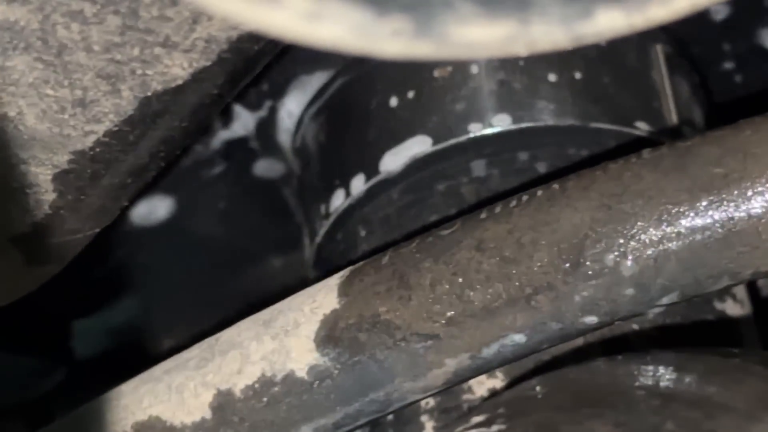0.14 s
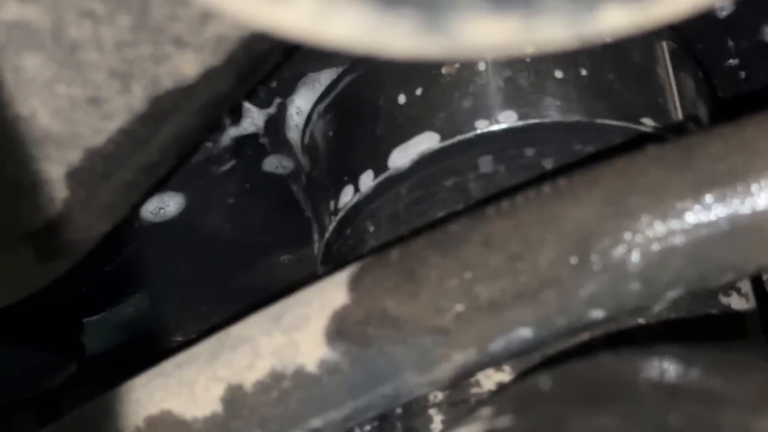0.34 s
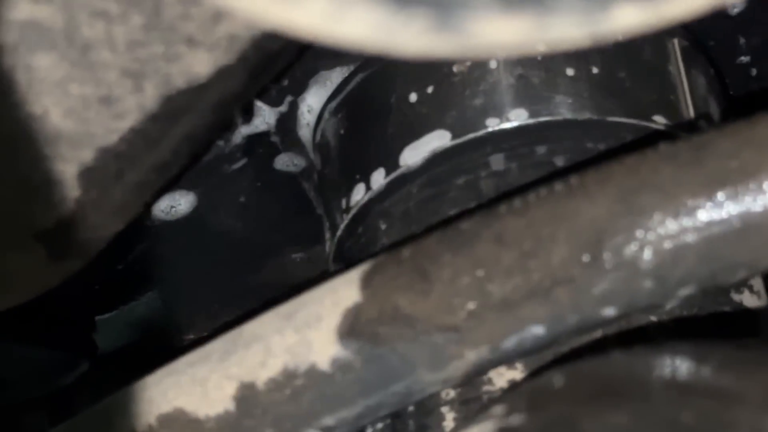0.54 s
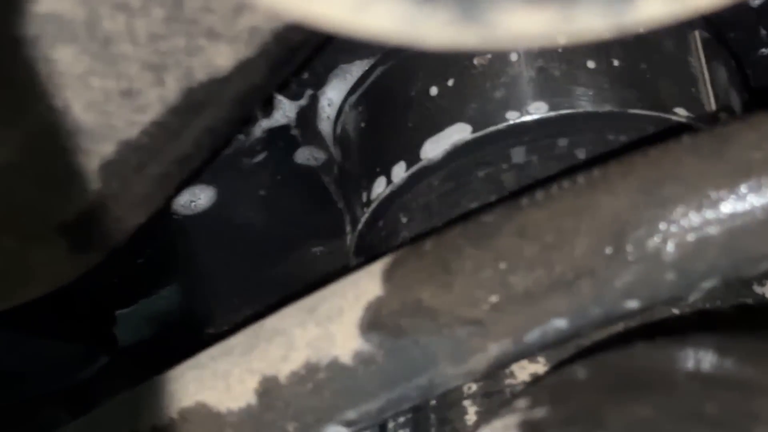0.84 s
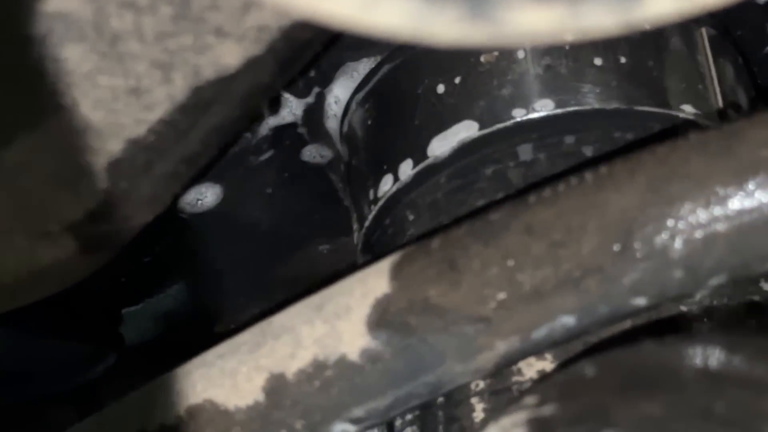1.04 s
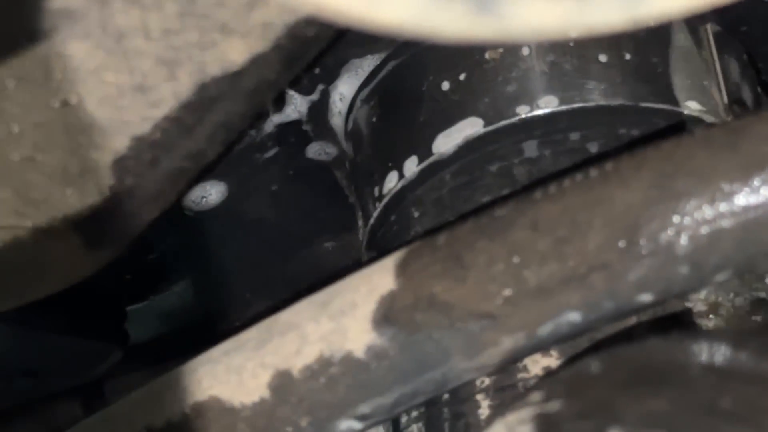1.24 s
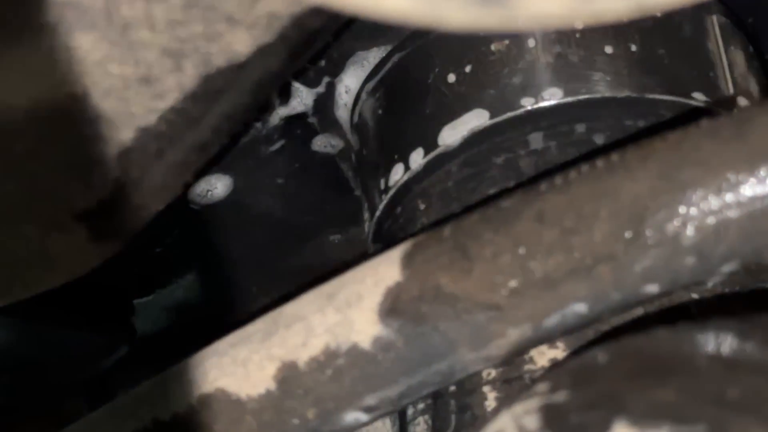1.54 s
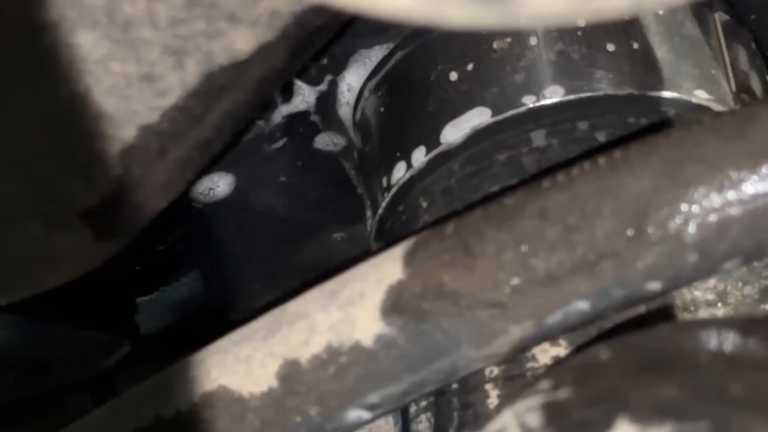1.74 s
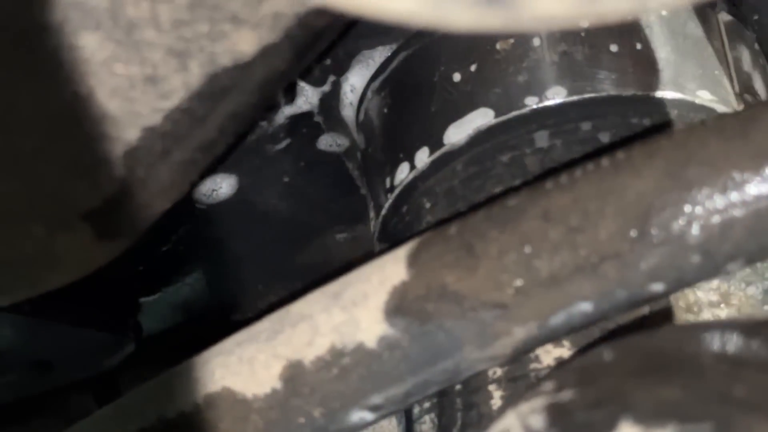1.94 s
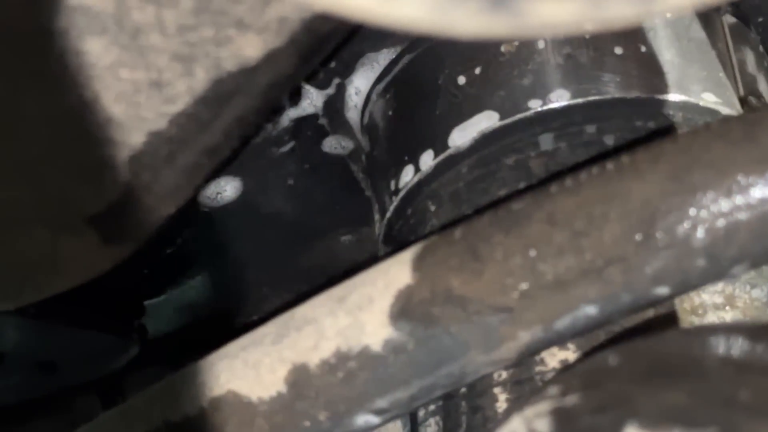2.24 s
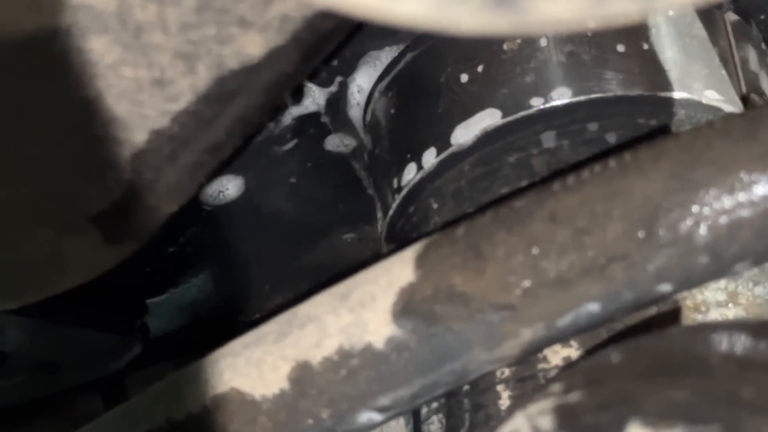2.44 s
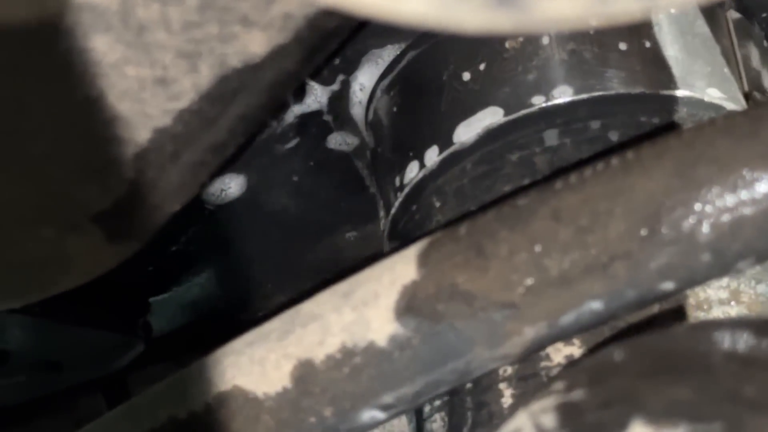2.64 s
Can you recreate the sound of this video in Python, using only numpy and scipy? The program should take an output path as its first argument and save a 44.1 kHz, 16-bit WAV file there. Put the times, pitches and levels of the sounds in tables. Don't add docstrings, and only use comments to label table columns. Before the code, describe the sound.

A pressurised air leak hisses loudly and continuously from a soapy metal pipe joint, very close to a handheld phone, with fine foam ticks, two soft handling bumps and a faint low workshop rumble.

```python
import sys
import numpy as np
from scipy import signal
from scipy.fft import rfft, irfft, next_fast_len
from scipy.io import wavfile
from scipy.ndimage import uniform_filter1d

SR = 44100
rng = np.random.default_rng(int(sys.argv[2]) if len(sys.argv) > 2 else 0)


def transcribe(u):
    v = np.clip(np.atleast_2d(u).T, -1, 1)
    q = np.round(v * 32767).astype(np.int16)
    wavfile.write(sys.argv[1], SR, q)


def ratio(d):
    e = np.asarray(d, float) / 20
    return 10 ** e


N = 123479
SIZE = next_fast_len(N + 4096)
HZ = np.arange(SIZE // 2 + 1) * SR / SIZE

# [f/Hz, width/Hz,
# level/dB]
JET_RESONANCES = [(2140, 60, -19), (2250, 110, -15), (2640, 210, -26.5), (3000, 280, -35.5), (3260, 110, -28),
                  (3540, 320, -33.5), (3795, 100, -18.5), (4030, 170, -30), (4345, 90, -25), (4570, 180, -25.5),
                  (4850, 340, -25.5), (5240, 330, -23), (5560, 240, -23), (5810, 170, -20),
                  (6200, 210, -14.3), (6600, 280, -7.4), (6800, 150, -11.7), (6990, 190, -9.8),
             (7160, 170, -11.6), (7470, 380, -8.1), (7700, 40, -15.0), (7930, 180, -4.0), (8460, 520, -4.7),
             (8950, 310, -5.8), (9090, 60, -8.0),
                  (9350, 200, -13.4), (9570, 210, -7.2), (10010, 260, -9.9), (10330, 250, -8.8),
             (10620, 250, -9.3), (10860, 160, -4.6), (11010, 90, -9.9), (11110, 160, -10.9),
             (11290, 130, -1.6), (11440, 90, -10.4), (11570, 100, -7.7), (12040, 550, -5.1),
             (12310, 300, -6.5),
                  (12570, 160, -2.6), (12770, 160, -0.7), (13050, 230, -4.9), (13340, 130, -6.2),
             (13660, 250, -0.1), (13900, 100, -5.1), (14100, 280, -3.2), (14480, 160, -5.3),
             (14690, 170, -10.6), (14810, 120, -9.4), (15030, 180, -14.1), (15280, 480, -14.8),
             (15630, 160, -6.7)]
JET_MODES = JET_RESONANCES
# [t/s, level/dB]
FOAM_SPITS = [
    (.648, -10),
    (.9127, -3),
    (.9605, -8),
    (1.71, -9),
    (1.823, -6),
]
# [f/Hz, phase/rad]
PORT_LEAD = [(6000, 0.), (6900, -.75), (7450, -3.14), (8080, -6.05), (9200, -5.7), (10100, -3.35),
             (11700, -3.05), (14050, -.03)]
# [f/Hz, width/Hz, level/dB]
SCATTER_PATHS = [(6350, 700, -10), (7800, 340, -6), (9800, 1200, -4), (13000, 1300, -7), (15620, 330, -11)]
# [t/s, level/dB]
HAND_BUMPS = [
    (1.279, -28.5),
    (1.829, -35.5),
]
# [f/Hz, level/dB, t60/s]
PHONE_BODY = [(100, -1, .12), (285, -1, .08), (824, -8, .04)]
# [f/Hz, level/dB]
SHOP_SUM = [(28, -23.5), (64, 3), (130, -7), (265, -11.5), (600, -19), (1000, -22.5), (1450, -23.5),
            (2050, -19.5), (2300, -79)]
# [f/Hz, level/dB]
SHOP_DIFFERENCE = [(24, -46), (40, -16), (80, -15), (113, -3.5), (145, -4.5), (401, -12), (1710, -4),
                   (2050, -10), (2660, -43), (4510, -120)]
# [f/Hz, width/Hz, level/dB, left share of power/0-1]
SHOP_DUCTS = [(829, 54, -59.5, .8), (1156, 86, -53.5, .8), (1752, 160, -52, 0.01)]

JET_DB, FLICKER_DB, FLICKER_RATE_HZ = -18, 0.3, 15
SWELL_DB, SWELL_RATE_HZ = 0.5, 5.66
SPRAY_PER_S, SPRAY_DB, SPRAY_SPREAD_DB = 150, -29, 3.5
WAVER_DB, WAVER_RATE_HZ = 4.0, 25
BUMP_RISE_S, BUMP_RIGHT_DB = 0.0016, -4
SCUFF_DB, SCUFF_T60_S = -4, 0.089
SHOP_SUM_DB, SHOP_DIFFERENCE_DB = -43.5, -51.5
HUM_HZ, HUM_DB, HUM_DIFFERENCE_DB = 120.6, -52.5, -12


def level(x, db):
    return x * ratio(db) / np.sqrt(np.mean(x ** 2))


def walk(rate):
    hold = max(int(SR / rate), 2)
    steps = np.repeat(rng.standard_normal(SIZE // hold + 1), hold)
    smooth = uniform_filter1d(uniform_filter1d(steps, hold), hold)
    return level(smooth[:SIZE], 0)


def ring(hz, width):
    return 1 / (1 + 2j * (HZ - hz) / width) ** 2


def white():
    return rng.standard_normal(len(HZ)) + 1j * rng.standard_normal(len(HZ))


def ringing_noise(hz, width):
    return irfft(white() * ring(hz, width), SIZE)


def decay(age, t60):
    return np.exp(-np.log(1000) * age / t60)


def turbulence():
    hiss = np.zeros(SIZE)
    for hz, width, db in JET_MODES:
        flicker = ratio(db + FLICKER_DB * walk(FLICKER_RATE_HZ))
        hiss += flicker * ringing_noise(hz, width)
    return level(hiss, JET_DB)


def foam():
    clicks = np.zeros(SIZE)
    when, chance = rng.random((2, int(SPRAY_PER_S * N / SR)))
    clicks[(when * N).astype(int)] = ratio(SPRAY_DB - SPRAY_SPREAD_DB * np.log(chance))
    for s, db in FOAM_SPITS:
        clicks[int(s * SR)] = ratio(db)
    power = sum(np.abs(ratio(db) * ring(hz, width)) ** 2 for hz, width, db in JET_MODES)
    colour = np.sqrt(power)
    peak = np.abs(irfft(colour, SIZE)).max()
    return irfft(rfft(clicks) * colour / peak, SIZE)


def ports(direct, scattered):
    half_turn = np.exp(0.5j * np.interp(HZ, *np.array(PORT_LEAD).T))
    spectrum = rfft(scattered)
    wavering = np.zeros(SIZE)
    for hz, width, db in SCATTER_PATHS:
        path = irfft(spectrum * ratio(db) * np.abs(ring(hz, width)) ** 2, SIZE)
        wavering += path * ratio(WAVER_DB * walk(WAVER_RATE_HZ))
    same, opposite = rfft(direct), rfft(wavering)
    left = (same + opposite) / half_turn
    right = (same - opposite) * half_turn
    return irfft(np.array([left, right]), SIZE)


def bumps():
    t = np.arange(SIZE) / SR
    scuff = np.array([level(ringing_noise(210, 860), SCUFF_DB) for _ in range(2)])
    port_gain = ratio([[0], [BUMP_RIGHT_DB]])
    out = np.zeros((2, SIZE))
    for s, db in HAND_BUMPS:
        age = np.maximum(t - s, 0)
        rise = ratio(db) * (1 - np.exp(-age / BUMP_RISE_S))
        body = np.zeros(SIZE)
        for hz, mode_db, t60 in PHONE_BODY:
            body += ratio(mode_db) * np.sin(2 * np.pi * hz * age) * decay(age, t60)
        out += rise * (body * port_gain + scuff * decay(age, SCUFF_T60_S))
    return out


def coloured(points):
    hz, db = np.array(points).T
    shape_db = np.interp(np.log(HZ + 1), np.log(hz), db, right=-90)
    return irfft(white() * ratio(shape_db), SIZE)


def mains_hum():
    phase = 2 * np.pi * HUM_HZ * np.arange(SIZE) / SR + 0.25 * walk(5.1)
    return np.sqrt(2) * np.sin(phase) * ratio(HUM_DB + 2.0 * walk(4.13))


def shop():
    hum = mains_hum()
    mid = level(coloured(SHOP_SUM), SHOP_SUM_DB) + hum
    side = level(coloured(SHOP_DIFFERENCE), SHOP_DIFFERENCE_DB)
    side = side + ratio(HUM_DIFFERENCE_DB) * np.roll(hum, 90)
    out = np.array([mid + side, mid - side])
    for hz, width, db, left in SHOP_DUCTS:
        out += np.sqrt([[left], [1 - left]]) * level(ringing_noise(hz, width), db)
    return out


def scene():
    flow = ratio(SWELL_DB * walk(SWELL_RATE_HZ))
    jet = ports(flow * turbulence() + foam(), flow * turbulence())
    return (jet + bumps() + shop())[:, :N]


def top_cut(x):
    return signal.sosfilt(signal.butter(12, 16890, fs=SR, output="sos"), x)


def record(dry):
    low_pass = signal.ellip(16, 0.3, 90, 15770, fs=SR, output="sos")
    return top_cut(signal.sosfilt(low_pass, dry))


dry = scene()
out = record(dry)
transcribe(out)
```